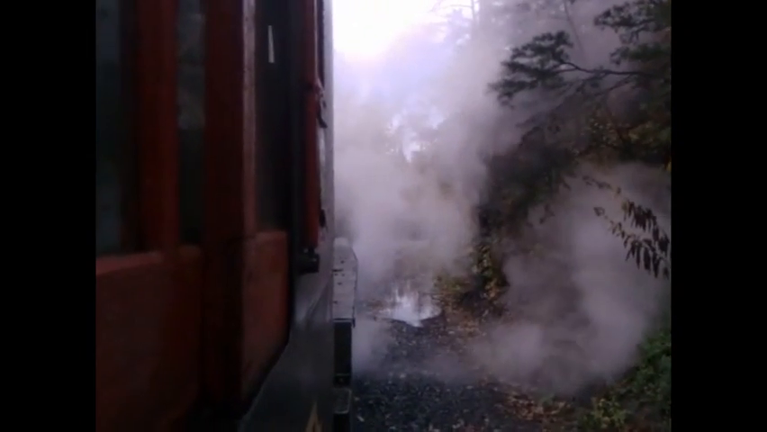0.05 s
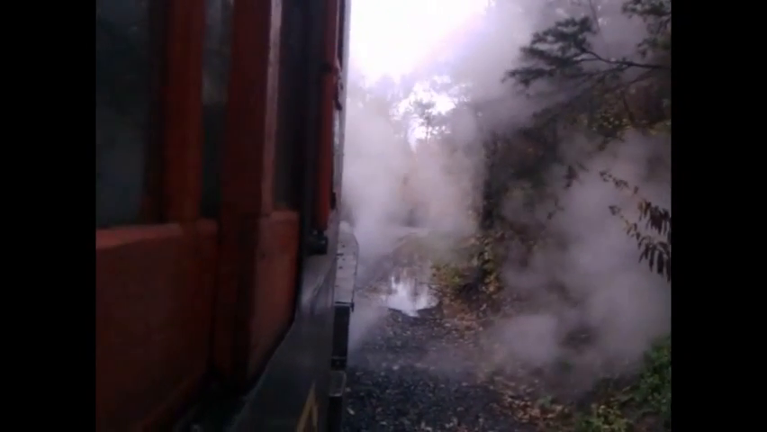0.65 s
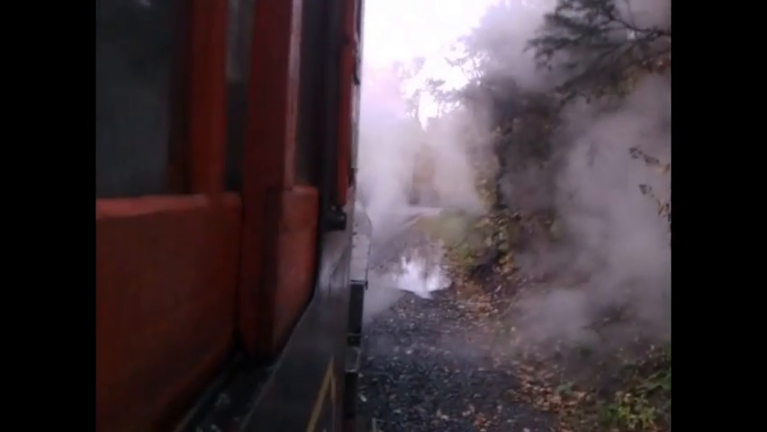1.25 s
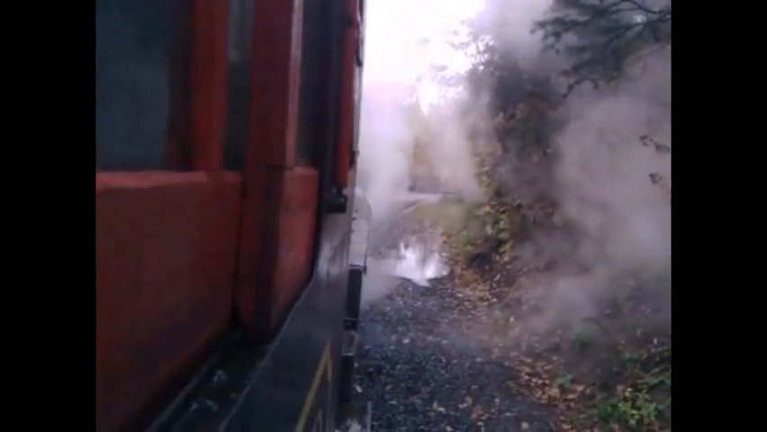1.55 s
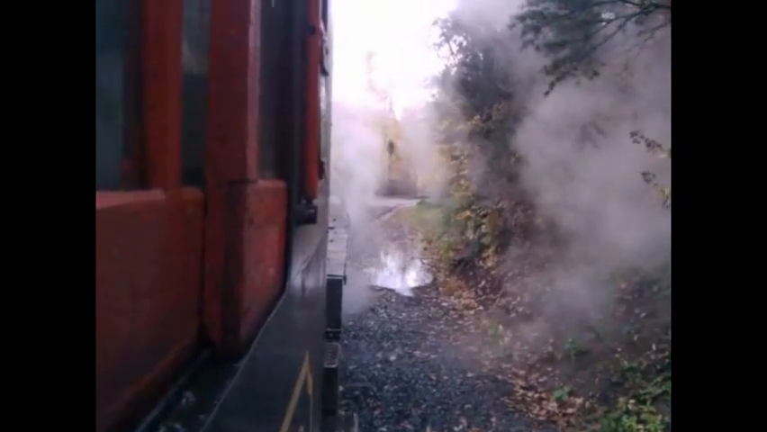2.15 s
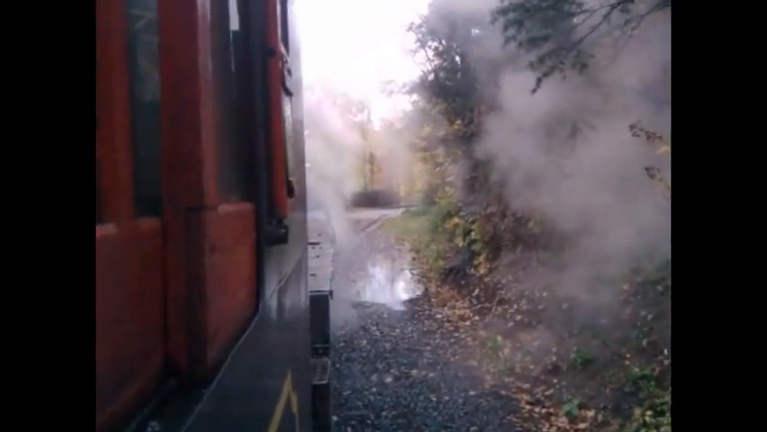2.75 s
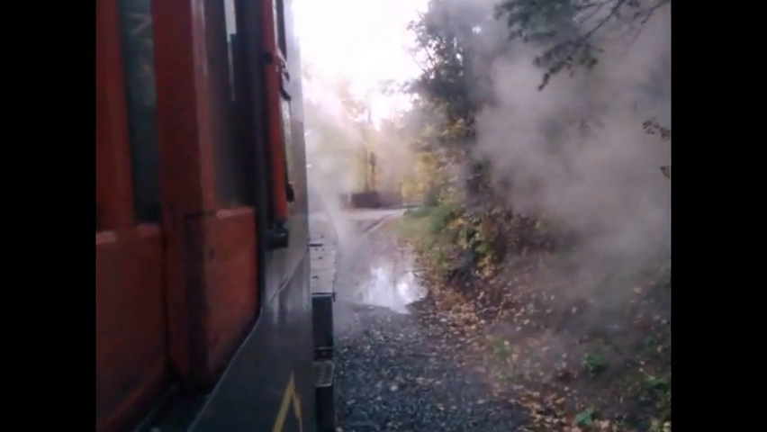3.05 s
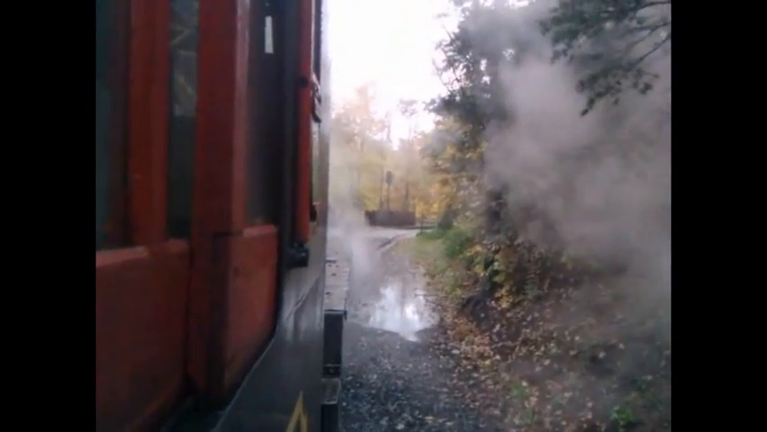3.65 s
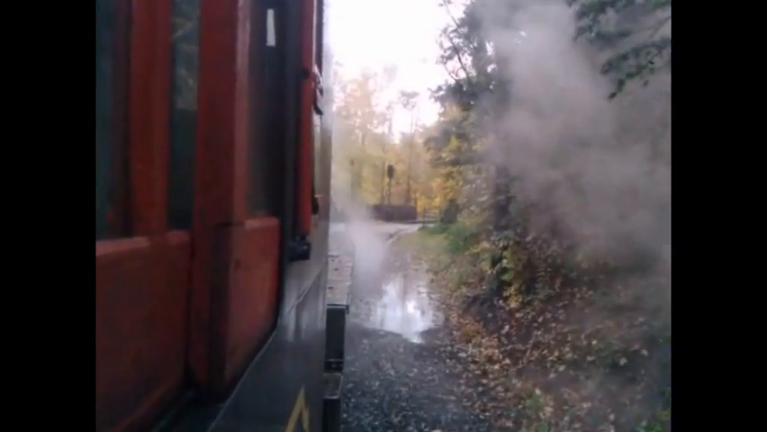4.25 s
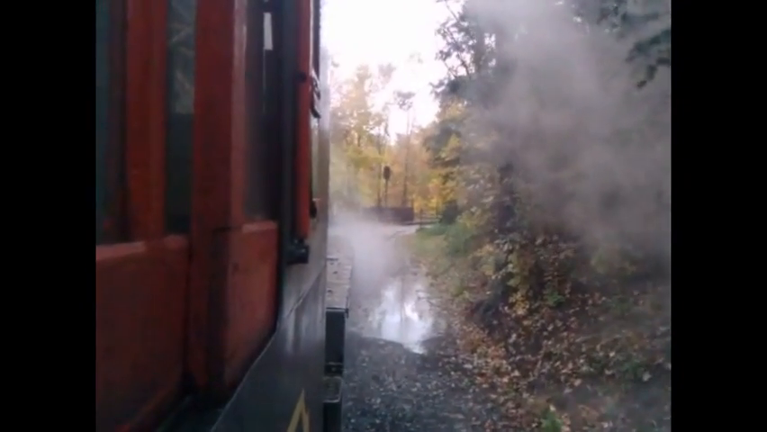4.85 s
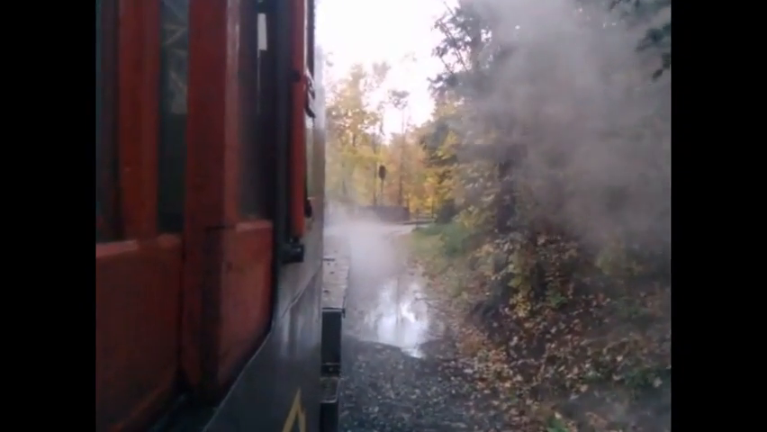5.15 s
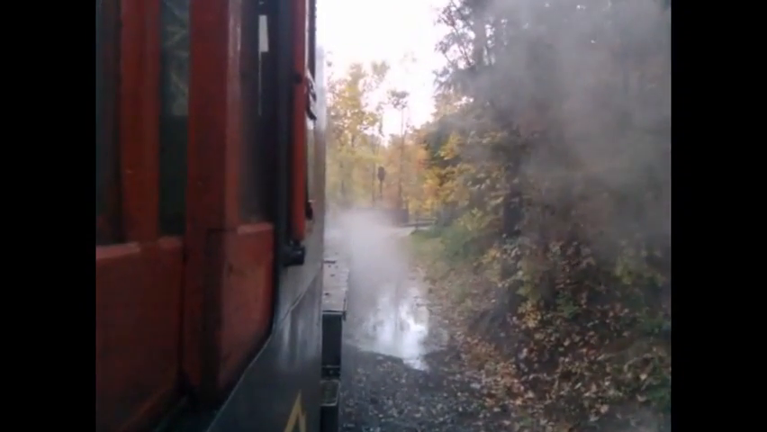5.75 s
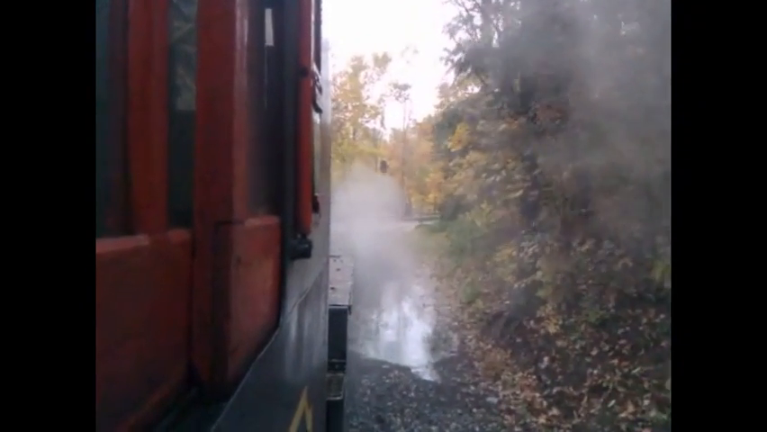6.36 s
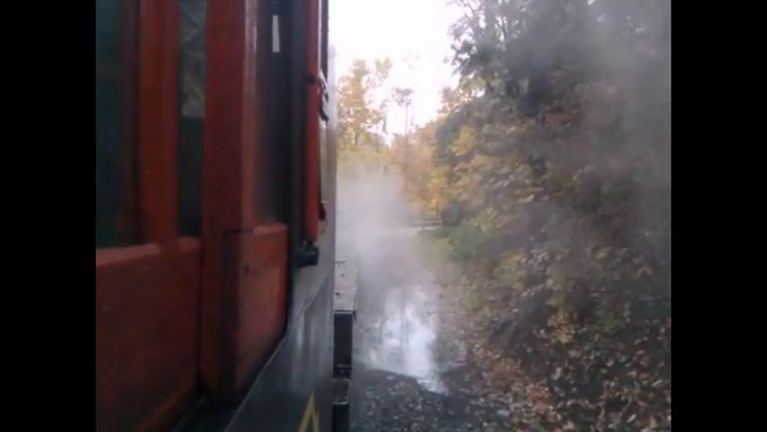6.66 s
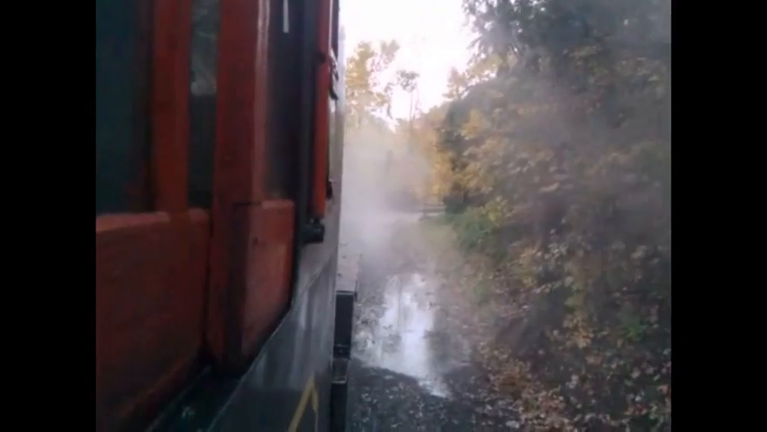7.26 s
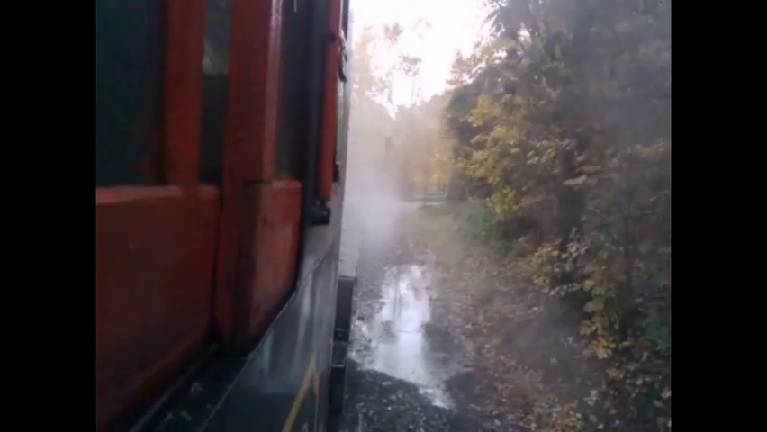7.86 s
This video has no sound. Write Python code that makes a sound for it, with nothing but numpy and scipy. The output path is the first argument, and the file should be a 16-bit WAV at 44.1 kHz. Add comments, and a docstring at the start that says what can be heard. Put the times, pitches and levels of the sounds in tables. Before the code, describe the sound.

Outdoors, from a carriage just behind a creeping steam engine, a small microphone picks up constant leaking steam and a low rolling rumble. Spits of steam and steel clanks come first, with a brief jet, then a loud rush of steam lasting over a second. Irregular dull chuffs, more spits, a shorter jet and a sharp coupling clank follow, and a faint wheel groan comes late.

```python
"""A steam locomotive creeps up a wet grade, heard from the side of the carriage behind it.
From the start, a steady steam leak and carriage rumble sit under dull, uneven chimney puffs, the clank
of slack couplings and bright spits of steam. Jets blow off beside the track: briefly at 0.4 s, long and
loud from 1.8 to 3 s, briefly again at 4.7 s. From 6.2 s a wheel groans faintly on the rail.
Throughout, the loudest peaks overload a small narrow-band recorder."""
import sys
import numpy as np
from scipy import signal
from scipy.fft import rfft, irfft, next_fast_len
from scipy.io import wavfile
from scipy.ndimage import uniform_filter1d

SR = 44100
rng = np.random.default_rng(int(sys.argv[2]) if len(sys.argv) > 2 else 0)


def materialize(psi):
    """Save the field psi as 16-bit PCM at rate SR to the path in sys.argv[1].

    A 1-D psi becomes a single channel; in a 2-D psi each row is a channel.
    """
    bounded = np.clip(np.atleast_2d(psi).T, -1, 1)
    quanta = np.round(bounded * 32767).astype(np.int16)
    wavfile.write(sys.argv[1], SR, quanta)


N = 347949
TIME = np.arange(N) / SR
FFT_SIZE = next_fast_len(N)
BIN_HZ = np.fft.rfftfreq(FFT_SIZE, 1 / SR)

# pressure behind the leak: time_s, level_db
LEAK_LEVEL = [(0, -25.8), (1.05, -26.5), (1.9, -27), (3.5, -25), (4.15, -24), (5.45, -27), (7.4, -26),
              (7.89, -24)]
# the leak's thin hiss: frequency_hz, level_db
LEAK_COLOUR = [(300, -26), (1000, -22.5), (2600, -19), (3500, -11), (4200, -9), (4600, -8), (5400, -5.5),
               (6100, -3), (6700, -0.5), (7300, -2), (8000, -13.5)]
# the singing of its gap: pitch_hz, width_hz, lift_db
LEAK_PEAKS = [(1597, 63, 9.6), (3320, 60, 2.2), (4140, 54, 3.3), (4320, 85, 10.7), (4475, 60, 5.5)]
# level of the low background rumble, which drops briefly near 4 s: time_s, level_db
RUMBLE_LEVEL = [(0, -38.5), (.65, -31.5), (1.03, -35), (1.5, -33.5), (3.6, -34), (4.02, -37.5), (4.3, -35),
                (5, -34), (7.89, -34)]
# its low-heavy tone: frequency_hz, level_db
RUMBLE_COLOUR = [(15, -11), (30, -2), (60, -0.5), (130, -1.5), (220, -.5), (400, -2.5), (700, -1.5),
                 (1100, -6), (2000, -5.5), (2700, -7.5), (4000, -10.5), (8000, -35)]
# the carriage's body resonances: pitch_hz, width_hz, lift_db
CARRIAGE_PEAKS = [(151, 21, 4.3), (300, 35, 4.1), (460, 34, 2), (710, 19, 1.3), (755, 21, 1.5),
                  (1000, 13, 0.99), (1690, 90, 2)]
# exhaust beats: start_s, level_db, rise_s, hold_s, boom_db, hiss_db
PUFFS = [(0, -22.5, 0.0053, 0.016, -18, -13), (0.142, -37, 0.012, .016, -10, 11),
         (0.308, -32, .013, 0.012, -7, -2), (1.47, -27, 0.048, 0.076, -5, 1),
         (2.814, -32, 0.037, 0.031, -0.5, -9), (3.346, -23.5, 0.031, 0.035, -20, -6.5),
         (3.662, -27, 0.064, 0.063, -5, 0.5), (4.145, -41, .04, 0.073, 1.5, 0),
         (5.435, -26.5, 0.058, 0.023, 0.5, -1.5), (5.949, -30, 0.011, 0.012, -13, -14),
         (6.44, -35.5, .015, .018, -13, -10), (6.79, -27, 0.046, 0.058, -5.5, 0.5),
         (7.148, -31.5, 0.023, 0.023, -11, -19), (7.534, -29, 0.062, 0.09, -6.5, -19)]
# the chimney's dull tone: frequency_hz, level_db
CHIMNEY_COLOUR = [(40, -28), (120, -9.5), (220, -7.5), (330, -5), (550, -0.5), (850, -8), (1300, -6.5),
                  (2200, -15.5), (8000, -35.5)]
# its air modes: pitch_hz, width_hz, lift_db
CHIMNEY_PEAKS = [(297, 50, 9), (570, 130, 0.5), (749, 97, 8.5), (913, 46, 7)]
# the smokebox boom: frequency_hz, level_db
BOOM_COLOUR = [(30, -18.5), (80, -20), (122, 2), (190, -11), (320, -8), (800, -29)]
# coupling and frame knocks: start_s, level_db, rattle_s, tilt_db_per_octave, ring_db, crack_db
CLANKS = [(.002, -15, .017, 0, -16, -8), (0.536, -21, .004, 1.5, -16, -4),
          (.636, -18, .017, -2.5, -14, -18), (.875, -28.5, .022, -2, -12, -13),
          (1.343, -13, .026, -0.5, -2.5, -13), (1.745, -32.5, .008, 2, -0.5, -11),
          (3.385, -32.5, .019, -7, -12.5, -16), (3.639, -19, .015, 1.5, -15, -13),
          (4.195, -30.5, .011, 2, -5, -12), (4.41, -31.5, .026, 8.5, -18, -19),
          (5.742, -12, .022, 0.1, -7, -18), (5.852, -29.5, .003, -5, -6, 0), (6.221, -33, .008, 1, -9, -3),
          (6.433, -21.5, .005, -2, -13, 7.5), (6.562, -33, .003, -4, -7, -2),
          (7.605, -25, .011, -8, -13, -9)]
# the steel they ring in: pitch_hz, level_db, t60_s
STEEL_MODES = [(580, -14.5, 0.56), (813, -5.5, 0.1), (1064, 1.5, 0.24), (1370, -2.5, 0.2), (1530, -16, .22),
               (1808, -4, 0.15), (1840, 0.5, 0.18), (2030, 0, 0.16), (2740, -11.5, 0.26), (3040, -10, 0.12),
               (3730, -3.5, 0.28), (3980, -16, 0.22), (4660, -5.5, 0.11)]
# the clatter round the ring: frequency_hz, level_db
CLATTER_COLOUR = [(60, -24), (200, -20), (500, -9.5), (1000, -4), (1800, -0.5), (2400, -3), (3600, -5.5),
                  (4600, -4), (7000, -8.5), (8000, -18)]
# its resonances: pitch_hz, width_hz, lift_db
CLATTER_PEAKS = [(1020, 53, 2), (1840, 62, 4), (2800, 100, 6.5), (4970, 110, -0.5)]
# spits of steam: start_s, level_db, rise_s, t60_s
SPITS = [(.066, -12, 0.026, 0.18), (.25, -14, 0.026, 0.28), (3.637, -18, 0.0091, 0.12),
         (3.732, -19.5, .024, 0.29), (4.386, -17.5, 0.019, 0.26), (4.672, -11.5, 0.0048, 0.21),
         (4.736, -19, .015, 0.18), (6.933, -15.5, 0.018, 0.47), (7.561, -20.5, 0.0052, 0.12),
         (7.608, -18.5, 0.014, 0.08)]
# the bright hiss of spits and blast pipe: frequency_hz, level_db
HISS_COLOUR = [(150, -20), (600, -18), (1300, -13), (2500, -8), (4000, -7), (5200, -1), (6500, -0.5),
               (7300, 1), (8000, -17)]
# valve openings: start_s, level_db, open_s, hold_s, close_s, swell_db_per_s, roar_start_db, roar_end_db
JETS = [(0.383, -30, 0.043, .012, 0.22, -4, 10, 3), (0.575, -17.5, 0.038, 0.12, 0.086, 7.5, 6, 0),
        (1.841, -11.5, 0.033, 0.8, 0.37, -1, -2.94, -3.5), (4.697, -22.5, 0.054, 0.054, 0.12, -4, 3, 7),
        (4.829, -17, 0.1, 0.026, 0.14, -6.5, 4.5, 5.5)]
# the jet's wide, bright rush: frequency_hz, level_db
JET_COLOUR = [(60, -19), (200, -22), (500, -13), (1100, -11.5), (2000, -7), (3000, -5.5), (4300, -4),
              (5500, -2), (6500, -0.5), (7300, -4), (8000, -1.5)]
# its resonances: pitch_hz, width_hz, lift_db
JET_PEAKS = [(598, 31, 8.2), (824, 58, 4.7), (1457, 27, 5.6), (1666, 52, 6.7), (1910, 38, 2.6),
             (2240, 92, 4.7), (2624, 40, 3.5), (3050, 20, 1.7), (4120, 180, 2.1), (5000, 41, 5.9),
             (6520, 29, 6.3)]
# its bounces off the ground and carriage side: delay_s, pressure_share
JET_REFLECTIONS = [(.00347, 0.15), (.00637, 0.053)]
# a wheel rubbing the rail: start_s, length_s, level_db
RUBS = [(6.23, 0.11, -39.5), (6.417, 0.5, -41), (7.146, 0.19, -41.5)]


def gain_of(db):
    """Decibels to amplitude."""
    return np.exp(np.asarray(db) * np.log(10) / 20)


def unit_rms(x):
    """Scales to rms 1."""
    return x / np.sqrt(np.mean(x ** 2) + 1e-20)


def fader(rows):
    """A gain ride through points of time_s, level_db."""
    return gain_of(np.interp(TIME, *np.transpose(rows)))


def eq_curve(colour, peaks=()):
    """A spectrum in dB: a broad colour with resonances on top."""
    hz, db = np.transpose(colour)
    broad = np.interp(np.log(BIN_HZ + 1), np.log(hz), db, right=-np.inf)
    return broad + sum(lift / (1 + (2 * (BIN_HZ - pitch) / width) ** 2) for pitch, width, lift in peaks)


def equalise(x, curve_db):
    """Filters x by a spectrum in dB."""
    return irfft(rfft(x, FFT_SIZE) * gain_of(curve_db), FFT_SIZE)[:N]


def band(x, centre_hz, octaves):
    """A bell-shaped band, 6 dB down that many octaves either side of its centre."""
    return equalise(x, -6 * (np.log2((BIN_HZ + 1) / centre_hz) / octaves) ** 2)


def turbulence(curve_db, patchy_db, flutter_db):
    """Flow noise of rms 1: eddies lift patches of the spectrum, and the whole flow flutters."""
    real, imaginary, eddies = rng.standard_normal((3, 257, N // 256 + 4))
    patches = unit_rms(uniform_filter1d(uniform_filter1d(eddies, size=7, axis=0), size=6, axis=1))
    flutter = unit_rms(uniform_filter1d(rng.standard_normal(eddies.shape[1]), size=4))
    frames = (real + 1j * imaginary) * gain_of(patchy_db * patches + flutter_db * flutter)
    noise = signal.istft(frames, window="cosine", nperseg=512)[1][:N]
    return unit_rms(equalise(noise, curve_db))


def burst(rise_s, hold_s, t60_s):
    """An envelope that swells, holds and dies away."""
    age = TIME[:SR // 2]
    attack = np.sin(np.pi / 2 * np.clip(age / rise_s, 0, 1)) ** 2
    return attack * gain_of(-60 * np.maximum(age - rise_s - hold_s, 0) / t60_s)


def add(mix, start_s, sound):
    """Drops a sound into the mix at its cue."""
    part = mix[max(round(start_s * SR), 0):][:len(sound)]
    part += sound[:len(part)]


def steam_leak():
    """Steam sings steadily through a narrow gap."""
    hiss = turbulence(eq_curve(LEAK_COLOUR, LEAK_PEAKS), patchy_db=0.7, flutter_db=0.25)
    return fader(LEAK_LEVEL) * hiss


def carriage_rumble():
    """Rolling wheels and the resonant carriage body lay down a low bed."""
    rumble = turbulence(eq_curve(RUMBLE_COLOUR, CARRIAGE_PEAKS), patchy_db=1.2, flutter_db=0.4)
    return fader(RUMBLE_LEVEL) * rumble


def chimney_puffs(t60_s=0.33):
    """Each beat pushes a dull, ragged puff up the chimney; the smokebox booms, the blast pipe hisses."""
    body, boom, hiss = np.zeros((3, N))
    for start_s, level_db, rise_s, hold_s, boom_db, hiss_db in PUFFS:
        beat = gain_of(level_db) * burst(rise_s, hold_s, t60_s)
        add(body, start_s, beat)
        add(boom, start_s, gain_of(boom_db) * beat)
        add(hiss, start_s, gain_of(hiss_db) * beat)
    body *= turbulence(eq_curve(CHIMNEY_COLOUR, CHIMNEY_PEAKS), patchy_db=1.3, flutter_db=0.6)
    boom *= turbulence(eq_curve(BOOM_COLOUR), patchy_db=0.4, flutter_db=0.3)
    hiss *= turbulence(eq_curve(HISS_COLOUR), patchy_db=1, flutter_db=0.4)
    return body + boom + hiss


def coupling_clanks(attack_s=0.002, crack_s=0.0048, clatter_t60_s=0.23):
    """Slack runs in, steel on steel: a first crack, a dense clatter, and modes that ring on."""
    size = SR // 2
    age = TIME[:size]
    steel = sum(gain_of(db - 60 * age / t60) * np.sin(2 * np.pi * hz * age) for hz, db, t60 in STEEL_MODES)
    clatter = turbulence(eq_curve(CLATTER_COLOUR, CLATTER_PEAKS), patchy_db=1, flutter_db=0.4)
    crack = unit_rms(band(clatter, centre_hz=1700, octaves=0.57))
    octaves = np.log2(np.maximum(np.fft.rfftfreq(size, 1 / SR), 300) / 1800)  # tilt pivots on 1800 Hz
    attack = np.minimum(age / attack_s, 1)
    out = np.zeros(N)
    for start_s, level_db, rattle_s, tilt, ring_db, crack_db in CLANKS:
        start = round(start_s * SR)
        # many small contacts, spread over the rattling time, feed every mode alike
        flat_spectrum = np.exp(2j * np.pi * rng.random(size))
        contacts = irfft(flat_spectrum[:round(rattle_s * SR / 2) + 2])
        ring = signal.fftconvolve(contacts, steel)[:size]
        ring /= np.sqrt(uniform_filter1d(ring ** 2, size=900).max())
        fade = gain_of(-60 * np.maximum(age - rattle_s, 0) / clatter_t60_s)
        rattle = fade * np.roll(clatter, -start)[:size]
        snap = gain_of(crack_db) * np.exp(-(age / crack_s) ** 2) * np.roll(crack, -start)[:size]
        knock = gain_of(ring_db) * ring + attack * (rattle + snap)
        add(out, start_s, irfft(rfft(knock) * gain_of(level_db + tilt * octaves), size))
    return out


def steam_spits():
    """Steam escapes in short, bright sneezes."""
    flow = np.zeros(N)
    for start_s, level_db, rise_s, t60_s in SPITS:
        add(flow, start_s, gain_of(level_db) * burst(rise_s, 0, t60_s))
    return flow * turbulence(eq_curve(HISS_COLOUR), patchy_db=1, flutter_db=0.4)


def bank_echo(x, t60_s=0.22, predelay_s=0.02, taps_per_s=2000):
    """The wooded bank scatters a short echo."""
    age = TIME[:SR // 2]
    taps = rng.standard_normal(len(age)) * (rng.random(len(age)) < taps_per_s / SR)
    taps *= (age > predelay_s) * gain_of(-60 * age / t60_s)
    return signal.fftconvolve(x, taps / np.linalg.norm(taps))[:N]


def steam_jets():
    """A valve opens, holds and shuts on a wide jet; water in the steam sets its midrange roar."""
    jet = turbulence(eq_curve(JET_COLOUR, JET_PEAKS), patchy_db=1.28, flutter_db=0.33)
    jet += sum(share * np.roll(jet, round(delay_s * SR)) for delay_s, share in JET_REFLECTIONS)
    roar = band(jet, centre_hz=1900, octaves=1.42)
    out = np.zeros(N)
    for start_s, level_db, open_s, hold_s, close_s, swell_db_per_s, roar_start_db, roar_end_db in JETS:
        length_s = open_s + hold_s + close_s
        age = np.clip(TIME - start_s, 0, length_s)
        valve = np.clip(np.minimum(age / open_s, (length_s - age) / close_s), 0, 1)
        roar_gain = gain_of(roar_start_db + (roar_end_db - roar_start_db) * age / length_s)
        out += valve * gain_of(level_db + swell_db_per_s * age) * (jet + (roar_gain - 1) * roar)
    return out


def wheel_groan(pitch_hz=677, sag_hz_per_s=25, width_hz=22):
    """Each rub on the rail swells and fades in one wheel resonance, which sinks steadily."""
    pressure = sum(gain_of(level_db) * np.sin(np.pi * np.clip((TIME - start_s) / length_s, 0, 1))
                   for start_s, length_s, level_db in RUBS)
    friction = rng.standard_normal(N) + 1j * rng.standard_normal(N)
    waver = signal.lfilter([1], [1, -np.exp(-np.pi * width_hz / SR)], friction)
    hz = pitch_hz - sag_hz_per_s * (TIME - RUBS[0][0])
    tone = np.exp(2j * np.pi * np.cumsum(hz) / SR)
    return pressure * unit_rms((waver * tone).real)


def scene(echo_db=-18):
    """The mono mix; only spits, puffs and clanks feed the echo."""
    hits = steam_spits() + chimney_puffs() + coupling_clanks()
    sustained = steam_leak() + carriage_rumble() + wheel_groan() + steam_jets()
    return (sustained + hits + gain_of(echo_db) * bank_echo(hits))[None]


def record(dry, band_hz=7265, knee=0.38, ceiling=0.57, edge_hz=15800):
    """A narrow-band recorder cuts the top, soft-clips the loudest peaks and trims their fizz."""
    input_lowpass = signal.firwin(1501, band_hz, window=("kaiser", 8), fs=SR)
    output_lowpass = signal.firwin(511, edge_hz, window=("kaiser", 9), fs=SR)
    narrow = signal.oaconvolve(dry, input_lowpass[None], "same")
    clean = np.clip(narrow, -knee, knee)
    headroom = ceiling - knee
    clipped = clean + headroom * np.tanh((narrow - clean) / headroom)
    return signal.oaconvolve(clipped, output_lowpass[None], "same")


dry = scene()
out = record(dry)
materialize(out)
```